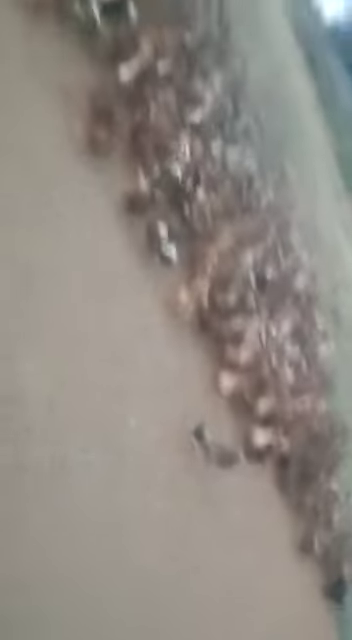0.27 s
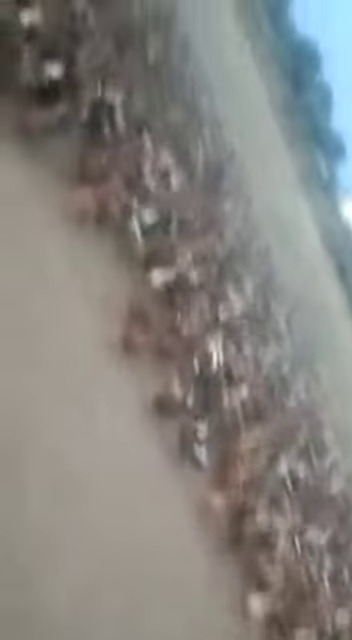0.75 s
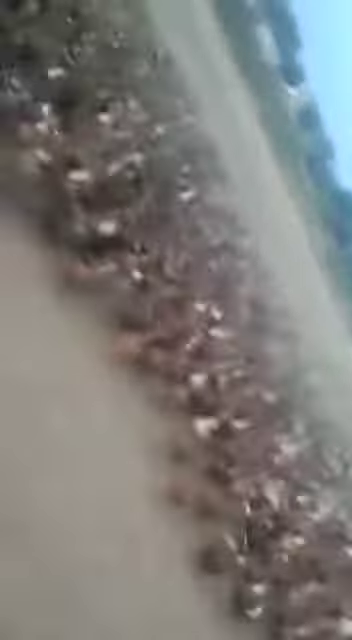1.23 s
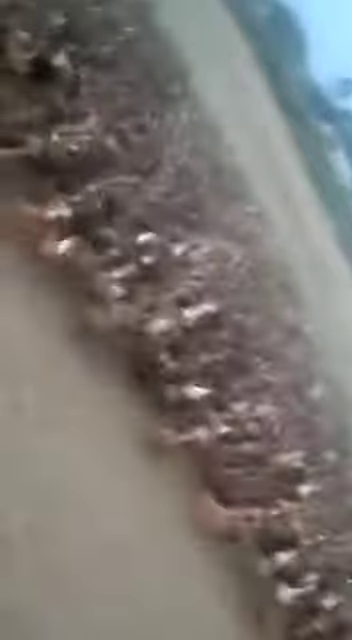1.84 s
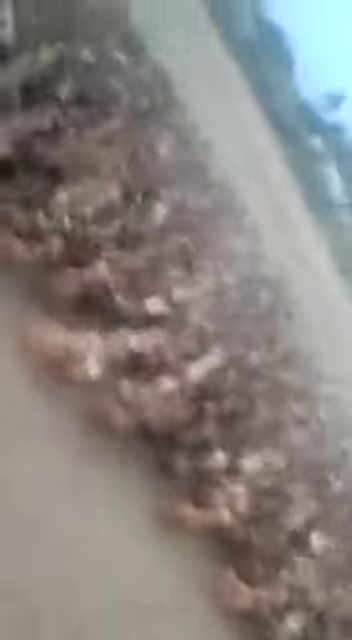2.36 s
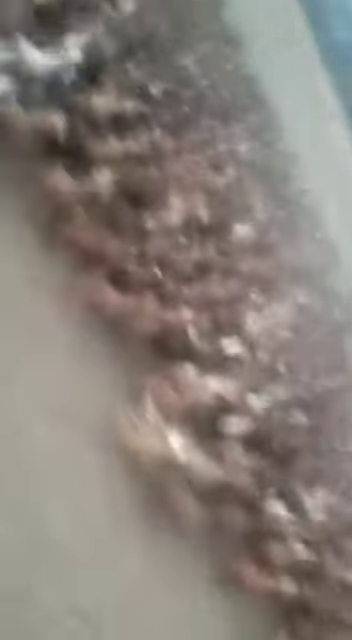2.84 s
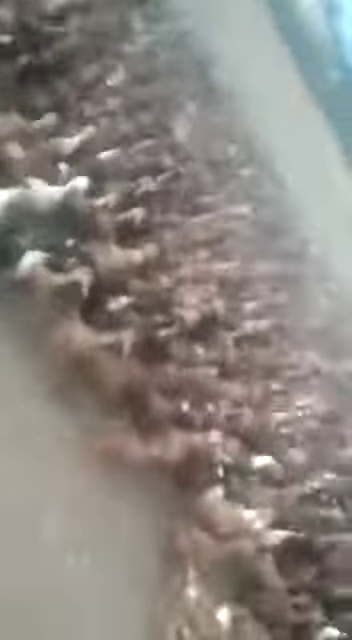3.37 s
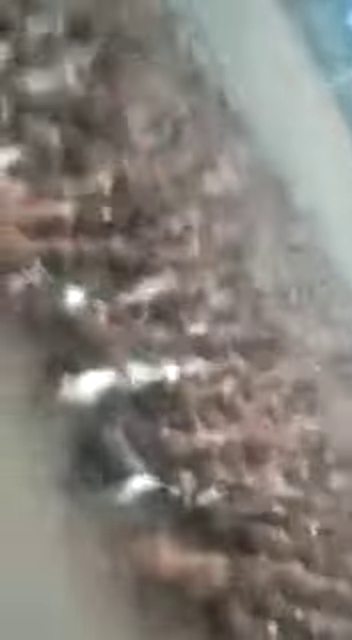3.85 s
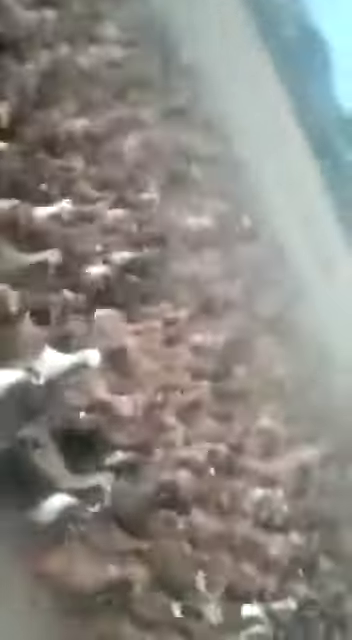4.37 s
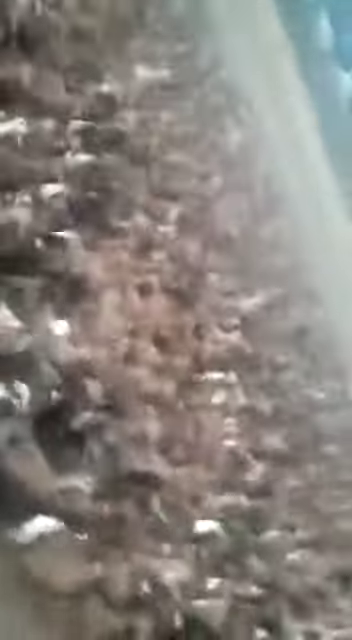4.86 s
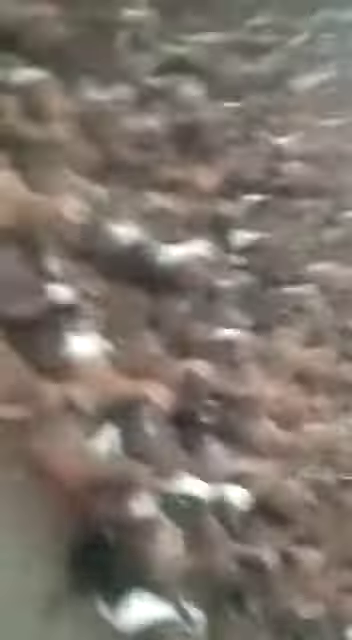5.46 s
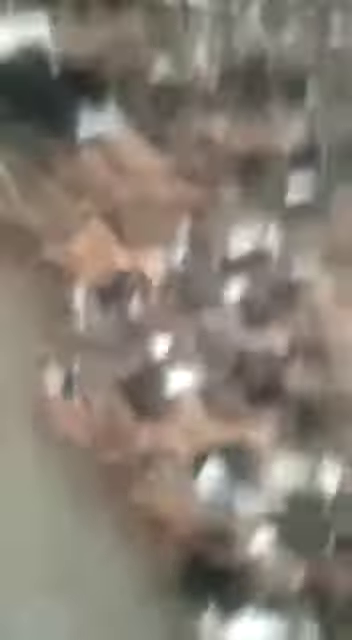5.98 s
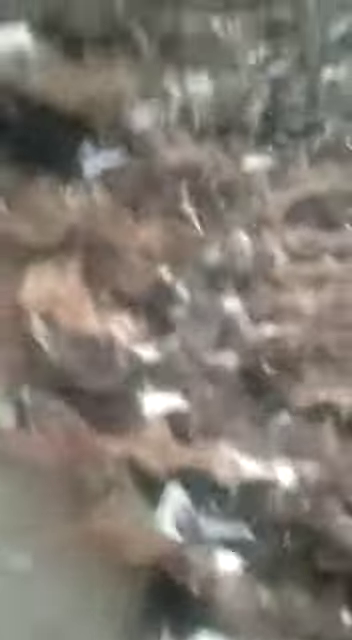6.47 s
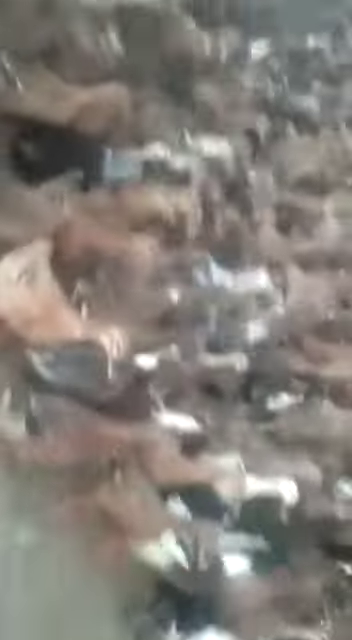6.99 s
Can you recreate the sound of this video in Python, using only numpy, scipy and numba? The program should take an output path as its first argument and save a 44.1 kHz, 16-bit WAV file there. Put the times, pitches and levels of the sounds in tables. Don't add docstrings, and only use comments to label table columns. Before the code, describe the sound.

A huge flock of ducks quacks in a dense, continuous chorus outdoors while wind rumbles, flutters and pops against a hand-held phone.

```python
import sys
import numpy as np
from scipy import signal
from scipy.io import wavfile
from scipy.ndimage import uniform_filter1d
from numba import njit

SR = 44100
rng = np.random.default_rng(int(sys.argv[2]) if len(sys.argv) > 2 else 0)


def log_audio(samples):
    frames = np.atleast_2d(samples).T
    limited = np.clip(frames, -1, 1)
    pcm = np.round(limited * 32767).astype(np.int16)
    wavfile.write(sys.argv[1], SR, pcm)


def volts(x):
    e = np.asarray(x, float) / 20
    return 10 ** e


N = 318843
TIME = np.arange(N) / SR


def level(x, db):
    return x * volts(db) / np.sqrt(np.mean(x ** 2))


def even(x, span_s):
    span = int(span_s * SR)
    power = uniform_filter1d(uniform_filter1d(x ** 2, span), span)
    return x / np.sqrt(power + 1e-12)


def band(x, lo_hz, hi_hz, order=2):
    return signal.sosfilt(signal.butter(order, [lo_hz, hi_hz], "bandpass", fs=SR, output="sos"), x)


def walk(rate_hz):
    hold = int(SR / rate_hz)
    steps = np.repeat(rng.standard_normal(N // hold + 1), hold)
    return 1.05 * uniform_filter1d(steps, hold)[:N]


def curves(table):
    s, *columns = np.transpose(table)
    return [np.interp(TIME, s, c) for c in columns]


def bumps(s, length):
    t, s, length = (np.float32(v) for v in (TIME, s, length))
    return np.exp(-(2 * (t - s[:, None]) / length[:, None]) ** 2)


def scatter(x, lags_ms, share):
    for lag in lags_ms:
        taps = np.zeros(int(lag * SR / 1000) + 1)
        taps[[0, -1]] = 1, np.clip(share, 0, .8)
        x = signal.lfilter(taps[::-1], taps, x)
    return x


# (frequency [Hz], width [Hz], level [dB])
HUM_RINGS = [(211, 170, 0)]
CHEST_RINGS = [(677, 360, -3), (702, 174, 0), (1003, 240, -6.5)]
THROAT_RINGS = [(1483, 153, 0.5), (1930, 157, 3), (2530, 330, -8)]
BILL_RINGS = [(3685, 880, -2.5), (4650, 316, 0), (5375, 480, -1.5), (6940, 1160, -2), (7480, 2520, -8)]
EDGE_RINGS = [(10500, 18000, 0)]


def duck_body(ring_db):
    rows = []
    for group, part in enumerate((HUM_RINGS, CHEST_RINGS, THROAT_RINGS, BILL_RINGS, EDGE_RINGS)):
        for hz, width_hz, db in part:
            rows.append((hz, width_hz, volts(db) * width_hz / 300, group))
    rows = np.array(rows, float)
    rows[rows[:, 0] == BILL_RINGS[1][0], 2] *= volts(ring_db)
    rows[1::2, 2] *= -1
    return rows


@njit
def quacks(calls, modes, noise, jitter, shimmer, breath, sag, closing, patch, arch, rise):
    out = np.zeros((5, len(noise)))
    for c in calls:
        first, n, r = int(c[0] * SR), max(int(c[3] * SR), 64), int(c[5])
        ring = np.zeros(len(modes), np.complex128)
        turn = np.zeros(len(modes), np.complex128)
        hz = modes[:, 0] * np.where(modes[:, 3] == 3, c[6], c[2])
        posture = np.exp(patch * noise[r // 2:r // 2 + len(modes)])
        gain = c[1] * np.where(modes[:, 3] >= 3, c[7], 1.) * modes[:, 2] * posture
        phase, stretch, late = .9, 1., 0.
        for i in range(max(0, -first), min(n + 250, len(noise) - first)):
            u = i / n
            if i % 32 == 0 or i == -first:
                now_hz = hz * (1 + closing * (.5 - u))
                turn = np.exp((2j * np.pi * now_hz - np.pi * modes[:, 1]) / SR)
            effort = min(1., rise * u) * max(0., 1 - u ** 4)
            step = c[4] * (1 - sag * u + arch * u * (1 - u)) * stretch / SR
            phase += step
            x, late = late, 0.
            r = (r + 1) % len(noise)
            if phase >= 1:
                phase -= 1
                size = effort * np.exp(shimmer * noise[r - 7])
                x += size * phase / step
                late = size * (1 - phase / step)
                stretch = 1 + jitter * noise[r - 13]
            x += breath * effort * np.exp(-4 * phase) * noise[r]
            for k in range(len(modes)):
                ring[k] = ring[k] * turn[k] + x
                out[int(modes[k, 3]), first + i] += gain[k] * ring[k].imag
    return out


def crowd(noise):
    quacks_per_s, pulse_hz, pitch_spread = 88, 216, .14
    count = int(quacks_per_s * N / SR)
    flat, bell = rng.random((count, 3)).T, rng.standard_normal((count, 4)).T
    start = (np.arange(count) + 3 * flat[0] - 8) / quacks_per_s
    gain = volts(3.6 * bell[0])
    body_scale, bill_scale = 1 + 0.05 * bell[1], 1 + 0.079 * bell[3]
    length = .07 + .1 * flat[1]
    pulses = pulse_hz * np.exp(pitch_spread * bell[2])
    calls = [start, gain, body_scale, length, pulses, flat[2] * N, bill_scale, np.ones(count)]
    return quacks(np.transpose(calls), duck_body(ring_db=2.0), noise, jitter=.024, shimmer=0.054,
                  breath=0.12, sag=.12, closing=0.072, patch=0.24, arch=.25, rise=4.)


# (time [s], rumble level [dB])
WIND_PUSH = [(0.0, -20.5), (0.3, -27), (0.5, -21.5), (0.86, -24.5), (0.95, -32), (1.55, -33), (1.7, -36),
             (2.1, -44), (2.55, -40.5), (2.8, -49.5), (3.5, -46), (4.35, -42), (5.0, -38), (5.2, -29.5),
             (5.7, -34), (6.86, -38.5), (7.02, -32.5), (7.18, -21)]
# (time [s], rumble level [dB], length [s], flutter relative to rumble [dB])
WIND_GUSTS = [(0.034, -40, 0.025, -13), (0.42, -36, 0.036, -22), (0.78, -27, 0.031, 1),
              (1.032, -38, 0.043, -18), (1.204, -33, 0.13, 2.5), (1.33, -31, 0.12, -33),
              (1.47, -24.5, 0.071, -3), (1.558, -29, 0.068, -16), (2.156, -31, 0.042, -9),
              (2.37, -24.5, 0.16, -27), (2.533, -27, 0.023, -31), (3.086, -34, 0.02, -24),
              (3.18, -32.5, 0.16, -29), (3.698, -33, 0.052, -14), (3.812, -31, 0.088, -29),
              (4.39, -32, 0.041, -26), (4.488, -32, 0.06, -28), (4.573, -24.5, 0.034, -14),
              (4.775, -42, .08, -22), (4.891, -20.5, 0.017, -23), (4.942, -32, 0.024, 4),
              (5.31, -44, .06, -20), (5.414, -19.5, 0.022, -23), (5.527, -26.5, 0.036, -4),
              (5.923, -35, 0.034, 2), (6.204, -25.5, 0.037, -1), (6.432, -23, 0.094, -7),
              (6.582, -29, 0.036, -22), (6.667, -26.5, 0.032, -3.5), (7.11, -25.5, 0.13, 4),
              (0.306, -35, .05, 2), (1.81, -47.5, .05, 3), (1.93, -43, .06, -4), (2.703, -44, 0.072, -6),
              (2.936, -55, 0.03, 13), (3.6, -59, 0.037, 17), (3.926, -43, .05, -3), (4.107, -57, .08, 10),
              (2.252, -40, .06, -8), (3.276, -40, 0.054, -15), (3.099, -36, 0.031, -15),
              (5.038, -32, 0.046, -16), (5.697, -24, 0.027, -14), (6.32, -47, .04, -2),
              (6.762, -48, 0.046, -14), (6.992, -38, 0.033, 1)]
# (time [s], peak level [dB], length [s])
WIND_POPS = [(0.015, -33.5, 0.0017), (0.134, -15.5, 0.0027), (0.266, -14.5, 0.0038), (0.478, -13, 0.0027),
             (0.53, -15, 0.0024), (0.783, -13.5, 0.0021), (0.888, -15, 0.0054), (1.088, -19.5, 0.0023),
             (1.212, -14.5, 0.0038), (1.474, -25, 0.0057), (2.274, -19, 0.0081), (2.359, -36, 0.003),
             (4.489, -16, 0.007), (4.563, -15, 0.014), (4.883, -15.5, 0.0065), (4.938, -17, 0.0053),
             (5.102, -21, 0.0014), (5.247, -14, 0.0059), (5.3, -15, 0.0058), (5.404, -26, 0.0033),
             (5.519, -28, 0.0028), (6.081, -22, 0.0057), (6.195, -15, 0.0051), (6.395, -15, 0.0053),
             (6.424, -8, 0.0051), (6.676, -15.5, 0.0048), (7.062, -19, 0.0038), (7.108, -12, 0.0019),
             (7.174, -10.5, 0.0019), (7.215, -10.5, 0.0039)]


def wind():
    steady_db = curves(WIND_PUSH)[0]
    s, db, length, flutter_db = np.transpose(WIND_GUSTS)
    gusts = bumps(s, length)
    low = volts(steady_db) + volts(db) @ gusts
    steady_flutter_db = steady_db - 2.5 + 0.5 * (steady_db + 22)
    high = volts(steady_flutter_db) + volts(db + flutter_db) @ gusts

    eddies = 3 * walk(28)
    rumble = level(band(rng.standard_normal(N), 68.4, 173.6) * volts(eddies + 4.0 * walk(45)), 0)
    flutter = level(band(rng.standard_normal(N), 103, 327) * volts(eddies + 5.2 * walk(70)), 0)
    buffet = level(band(rng.standard_normal(N), 140, 284) * volts(eddies), -3.5)
    sway = level(band(rng.standard_normal(N), 12, 50) * low ** 0.6, -50.5)

    pops = np.zeros(N)
    around = np.arange(-400, 400)
    for s, db, length in WIND_POPS:
        t = around / SR / max(length, .001) * 4
        at = int((s + 0.00407) * SR) + around
        pops[np.clip(at, 0, N - 1)] += volts(db + 5.0) * -t * np.exp(-t ** 2 / 2)

    gusty = low * even(rumble, 0.049) + high * even(flutter, 0.026)
    return sway + gusty + buffet * low ** 0.31 * high ** 0.93 + band(pops, 77, 900, order=1)


def distant_hiss():
    return level(band(rng.standard_normal(N), 650, 6500), -62.0)


# (time [s], peak level [dB], throat ring [Hz], length [s], bill ring relative to throat [dB])
DEEP_DUCKS = [(0.872, -10.5, 1580, 0.095, -14.5), (1.501, -5, 1480, 0.085, -25),
              (1.746, -2, 1600, 0.067, -22.5), (1.88, -16.5, 1550, .085, -6.5),
              (2.159, -8.5, 1420, 0.053, -9.5), (2.389, -5, 1540, 0.043, -16.5),
              (2.598, -6, 1600, .073, -28), (3.381, -9, 1465, 0.095, -23), (3.577, -12, 1620, .085, -11),
              (4.163, -5, 1400, .077, -14), (4.255, -14.5, 1500, 0.13, -4), (4.385, -4, 1680, .07, -21),
              (4.934, -6.5, 1670, .06, -11), (5.117, -9, 1630, 0.053, -25), (5.682, -15.5, 1490, 0.1, -4),
              (0.298, -7, 1470, 0.067, -26), (1.394, -10, 1420, .08, -22), (6.715, -9, 1480, 0.1, -19),
              (6.24, -8.5, 1660, 0.17, -24), (7.08, -11, 1550, .13, -19), (6.202, -8.5, 1520, .085, -16.5),
              (6.309, -6, 1500, 0.11, -23)]
# (time [s], peak level [dB], throat ring [Hz], length [s], bill ring relative to throat [dB])
BRIGHT_DUCKS = [(0.8, -8.5, 1760, 0.047, -14), (0.969, -7.5, 1870, 0.099, -25),
                (1.117, -11, 1900, 0.069, -14), (1.224, -16.5, 2110, 0.062, -5.5),
                (1.969, -4, 1990, 0.062, -14), (2.74, -10.5, 2170, 0.078, -21),
                (3.135, -6, 1910, 0.074, -14), (3.441, -6.5, 2030, 0.078, -37),
                (3.656, -9.5, 1820, 0.089, -13.5), (3.805, -9, 1960, 0.14, -30),
                (3.925, -10, 1830, 0.14, -8), (4.517, -2, 2110, 0.081, -18), (4.713, -4, 1930, 0.041, -19),
                (4.775, -2, 2085, .05, -16.5), (4.81, -6.5, 1890, .06, -13), (5.034, -1.5, 2250, 0.06, -14),
                (5.172, -10, 1800, 0.066, -12.5), (5.283, -9.5, 2060, 0.13, -11),
                (5.541, -6.5, 2060, 0.13, -12), (5.755, -6, 1930, 0.085, -13),
                (5.917, -8.5, 1800, 0.11, -11), (6.132, -11.5, 2030, 0.057, -11.5),
                (6.462, -6, 1880, .078, -14.5), (0.168, -6, 1930, 0.068, -25),
                (0.37, -13.5, 2000, 0.093, -27), (0.552, -11, 2230, 0.076, -17),
                (1.681, -12.5, 2440, .08, -16), (2.89, -11, 2400, 0.078, -11),
                (3.76, -11, 2400, 0.082, -14), (4.3, -16.5, 1900, .07, -26), (5.306, -6, 2370, 0.047, -20),
                (5.446, -9, 1870, 0.085, -20), (5.97, -6.5, 1840, .13, -16.5),
                (6.38, -10.5, 2320, 0.058, -21), (6.84, -7.5, 2060, 0.072, -19),
                (7.02, -5, 2210, 0.048, -18.5), (6.633, -6, 1970, 0.055, -14),
                (6.777, -12.5, 1930, .085, -22)]


def nearest(noise):
    s, db, ring_hz, length, bill_db = np.transpose(DEEP_DUCKS + BRIGHT_DUCKS)
    usual_ring_hz = np.where(ring_hz < 1750, THROAT_RINGS[0][0], THROAT_RINGS[1][0])
    flat = rng.random((len(s), 3)).T
    bill_hz = (4500 + 0.57 * (ring_hz - 1600)) * (1 + 0.19 * (flat[2] - .5))
    bill_scale = bill_hz / BILL_RINGS[1][0]
    pulse_hz = 175 + 75 * flat[1]
    calls = [s - .009, volts(db), ring_hz / usual_ring_hz, length, pulse_hz, flat[0] * N,
             bill_scale, volts(bill_db)]
    return quacks(np.transpose(calls), duck_body(ring_db=2.0), noise, jitter=.011, shimmer=0.14,
                  breath=0.17, sag=.07, closing=0.1, patch=.1, arch=.25, rise=5.8)


# (time [s], peak level [dB], bill ring [Hz], length [s])
OPEN_BILLS = [(0.87, -31, 4130, 0.07), (1.012, -27, 5000, 0.11), (1.167, -25.5, 4550, 0.07),
              (1.488, -20, 4500, 0.06), (1.868, -21, 4650, 0.059), (2.071, -19, 4530, 0.07),
              (2.61, -16.5, 5360, 0.042), (2.736, -24, 4500, 0.059), (3.143, -26, 4470, 0.092),
              (3.53, -16, 4600, 0.063), (3.641, -20, 4830, 0.07), (3.858, -12.5, 5270, 0.11),
              (3.975, -18, 4200, 0.11), (4.207, -12, 4500, 0.089), (4.295, -30, 4750, 0.047),
              (4.621, -16, 5080, 0.083), (4.824, -15.5, 5370, 0.046), (5.328, -24, 5260, 0.12),
              (5.548, -24, 5100, 0.041), (5.7, -22, 5160, 0.082), (5.774, -15.5, 4300, 0.076),
              (5.74, -20, 5100, .07), (5.946, -14.5, 5060, 0.07), (6.04, -16, 4630, 0.05),
              (6.146, -15, 4960, 0.045), (6.211, -12.5, 4750, 0.07), (6.49, -19, 4600, 0.07),
              (6.773, -10, 4340, 0.058), (6.898, -12.5, 4150, 0.064), (7.09, -10.5, 5030, 0.04),
              (0.491, -20.5, 4700, .04), (1.75, -21, 4660, .06), (6.388, -18, 4800, .05),
              (5.58, -21, 5400, 0.051), (3.92, -19, 5600, 0.07), (6.959, -24, 4900, 0.044),
              (7.027, -22, 5100, 0.036)]


def raspers(noise):
    s, db, bill_hz, length = np.transpose(OPEN_BILLS)
    flat, same = rng.random((len(s), 2)).T, np.ones(len(s))
    pulse_hz = 200 + 70 * flat[1]
    bill_scale = bill_hz / BILL_RINGS[1][0]
    calls = [s - .01, volts(db), same, length, pulse_hz, flat[0] * N, bill_scale, same]
    parts = quacks(np.transpose(calls), duck_body(ring_db=11.5), noise, jitter=.011, shimmer=0.12,
                   breath=0.1, sag=.07, closing=0.067, patch=.1, arch=.25, rise=4.3)
    return parts[3]


# (time [s], loudness [dB], bills open [dB], facing the phone [dB])
FLOCK_MOOD = [(0.0, -24, -17, 4), (0.05, -26, -20.5, 0), (0.35, -23.5, -19, -4), (0.75, -21.5, -17.5, -6),
              (0.95, -20.5, -16.5, -5), (1.6, -21.5, -16, -4), (2.1, -22.5, -16, -5), (2.5, -22.5, -13, -6),
              (3.1, -21.5, -12.5, -7.5), (3.6, -20.5, -11, -2), (4.3, -20.5, -13, -1.5),
              (4.7, -21.5, -13, -1), (5.1, -20, -15, -1), (5.45, -20, -14, -4), (5.7, -18.5, -15, -15),
              (6.3, -20, -14, -11), (6.9, -18.5, -14.5, -7), (7.23, -21, -14, -18)]
# (time [s], level change [dB], length [s])
CHORUS_LULLS = [(0.116, 1.5, 0.038), (1.38, -2.5, 0.05), (1.6, -1.5, .07), (2.032, -3.5, 0.06),
                (2.234, -3.5, 0.017), (2.463, -2.5, 0.085), (3.206, -1.5, 0.011), (3.358, -0.5, 0.05),
                (4, -0.5, 0.13), (4.2, -0.5, 0.11), (3.9, -2, 0.11), (4.36, -3, 0.016), (4.49, -2, 0.18),
                (4.455, -2, 0.021), (4.61, -1.5, .05), (4.87, -1, .04), (4.5, -0.5, 0.027), (1.06, -1, .04),
                (2.31, -0.5, 0.034), (4.684, -2, 0.063), (4.776, -4, 0.027), (4.968, -3, 0.2),
                (5.06, -4, 0.063), (5.354, -4.5, 0.13), (5.634, -2.5, 0.15), (5.854, -3, 0.11),
                (6.625, 0, 0.036), (6.694, -2.5, 0.033), (7.1, -4.5, .02), (7.01, -2.5, .02),
                (6.6, 0.5, .02), (6.325, -2, .02), (5.895, -2, 0.026), (6.166, 1, 0.028), (3.8, -2.5, .03),
                (1.863, -0.5, .04), (2.978, -0.5, 0.037)]


def ducks():
    noise = rng.standard_normal(N)
    far, near = crowd(noise), nearest(noise)
    loud_db, open_db, facing_db = curves(FLOCK_MOOD)
    s, depth_db, length = np.transpose(CHORUS_LULLS)
    lull_db = depth_db @ bumps(s, length)

    hum = even(band(far[0], 156, 385), 0.11) * volts(-18.0)

    chest_db, approach_db_per_s = -17, 0.5
    chest = even(band(far[1], 700, 1880, order=3), 0.14) + level(band(near[1], 594, 1300), -7)
    chest = chest * volts(chest_db + approach_db_per_s * (TIME - 5.5) - 0.78 * lull_db)
    deep_db = chest_db - 7.5 + np.minimum(3.7 * (TIME - 3.5), 1.5)
    deepest_db = chest_db - 9.5 + 3.8 * approach_db_per_s * (TIME - 7.0)
    chest = chest + even(band(far[1], 570, 667), 0.1) * volts(deep_db)
    chest = chest + even(band(far[1], 457, 573), 0.047) * volts(deepest_db)

    throat = even(far[2], 0.066) + level(band(near[2], 890, 3360), -6.0)
    throat = band(throat, 1020, 3740, order=3)

    rasp = even(far[3], 0.11) + level(near[3], -5.0)
    rasp = rasp + (volts(0.29 * facing_db + 1.5) - 1) * band(rasp, 5100, 15000)
    bill = band(rasp, 1280, 8340, order=3) * volts(open_db + 4.0)

    edge = band(even(far[4], .08) + level(near[4], -1.5), 8800, 17500, order=1)
    air = level(edge, -39.5) * volts(facing_db + open_db + 18.5)

    lags_ms = (.4, .9)
    treble = scatter(bill + air, lags_ms, 0.42) * volts(0.5 * lull_db)
    chorus = (hum + chest + throat + treble) * volts(loud_db + lull_db)
    return chorus + scatter(level(raspers(noise), -40.5), lags_ms, 0.17)


def scene():
    return (ducks() + wind() + distant_hiss())[None]


def top_cut(x):
    return signal.sosfilt(signal.butter(12, 15400, fs=SR, output="sos"), x)


def record(dry):
    x = signal.sosfilt(signal.butter(2, 45, "highpass", fs=SR, output="sos"), dry)
    x = signal.sosfilt(signal.butter(2, 12700, fs=SR, output="sos"), x)
    x = np.tanh(0.84 * x) / 0.79
    x = x * np.minimum(np.arange(N)[::-1] / 130, 1)
    return top_cut(x)


dry = scene()
out = record(dry)
log_audio(out)
```